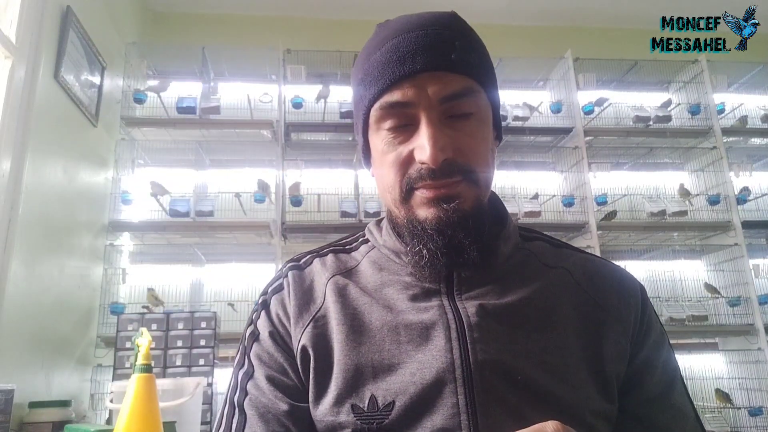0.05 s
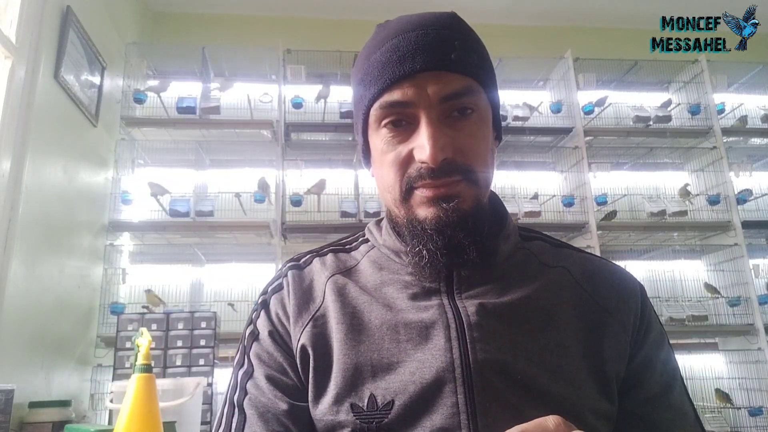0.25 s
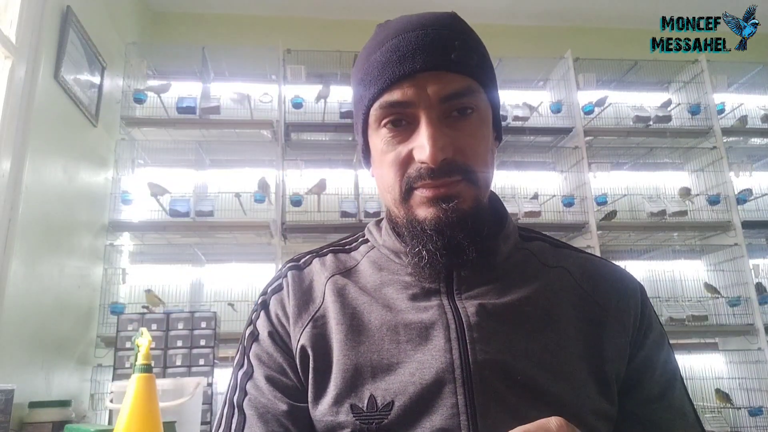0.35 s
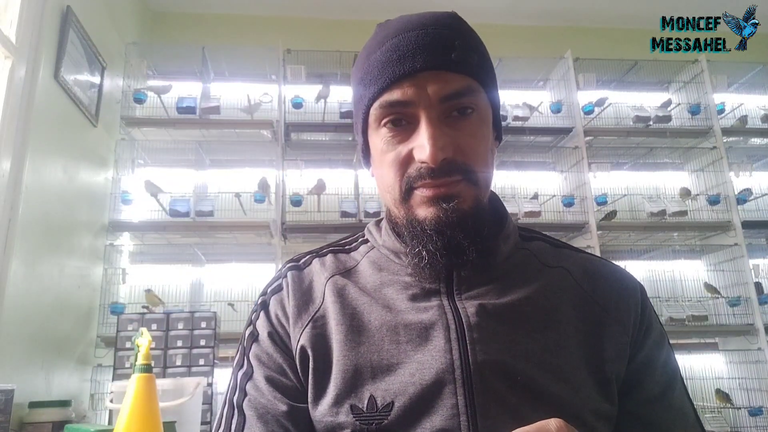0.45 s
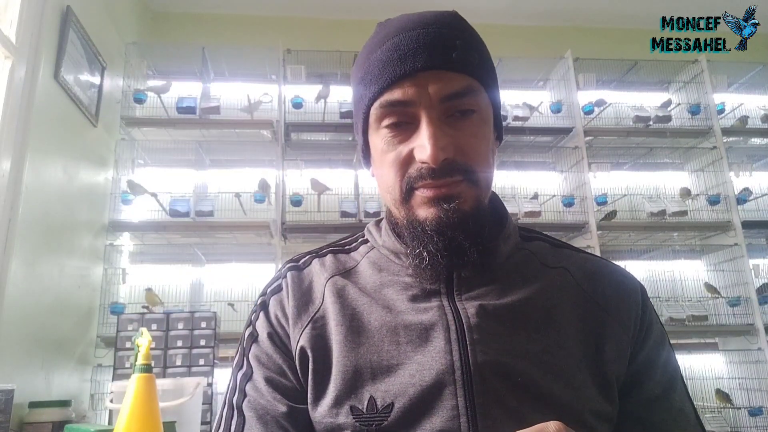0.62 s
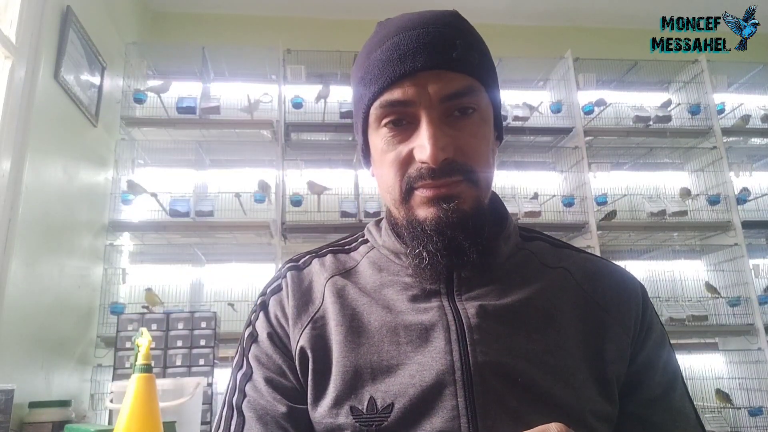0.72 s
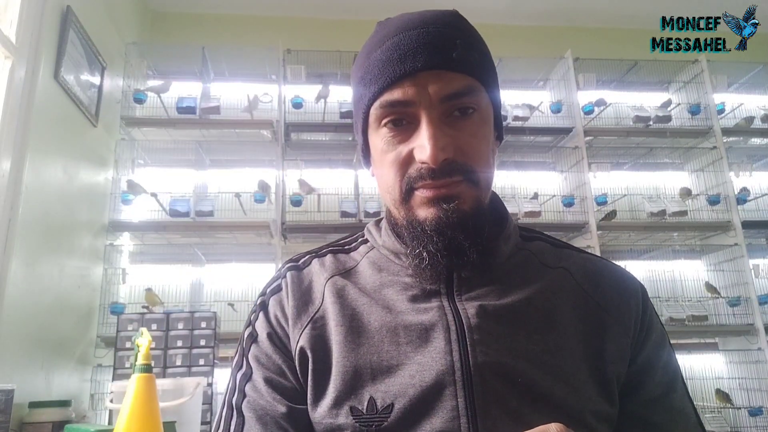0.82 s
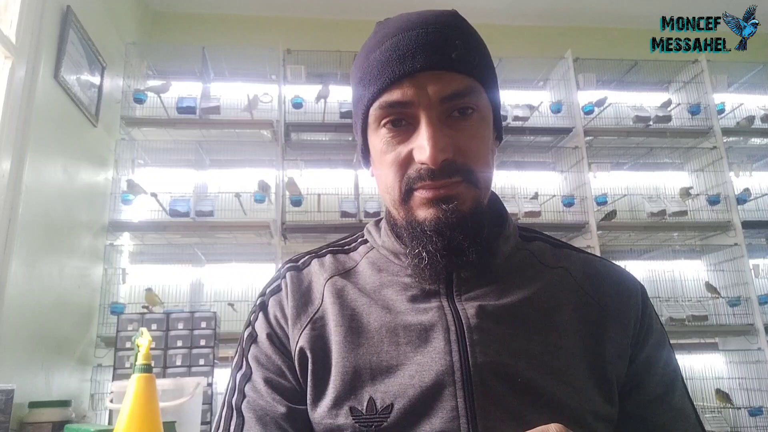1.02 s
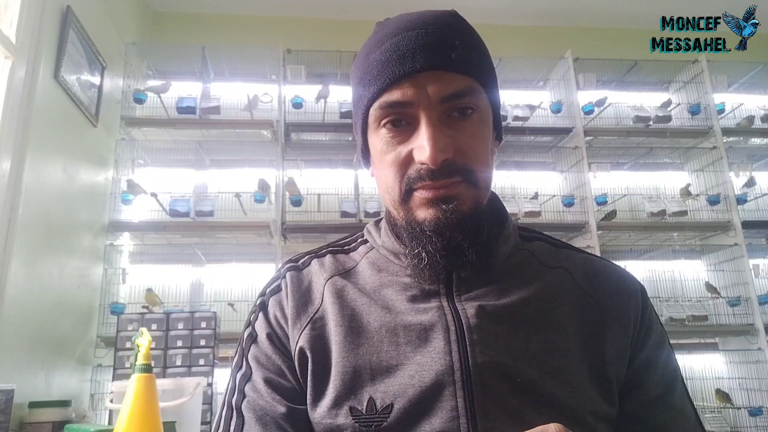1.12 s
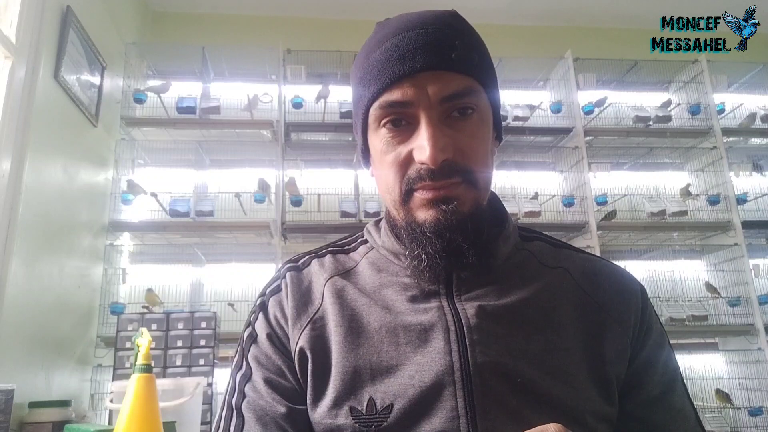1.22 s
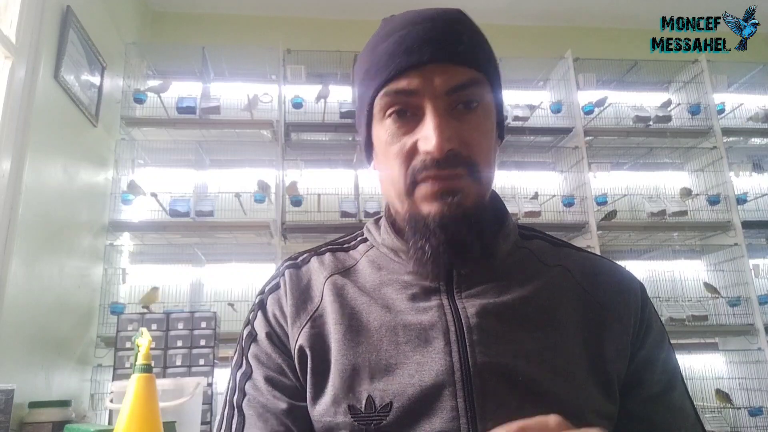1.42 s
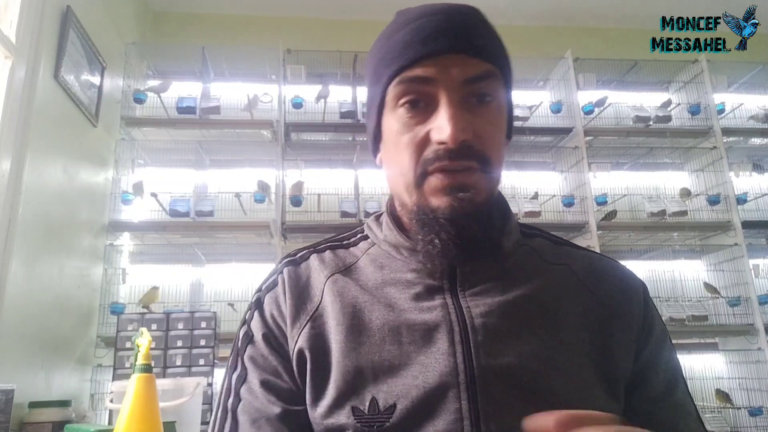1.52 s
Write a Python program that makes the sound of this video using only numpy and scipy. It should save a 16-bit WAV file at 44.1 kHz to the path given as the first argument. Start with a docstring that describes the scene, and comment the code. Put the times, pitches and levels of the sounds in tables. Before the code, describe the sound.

Canaries give soft calls amid light cage rustling, break into quick high whistles and sweeps, then pause before a few quieter chirps and a last scuff. The room adds a short echo and a faint steady hiss.

```python
"""Caged canaries whistle in a hard-walled bird room, over faint steady air noise and a low hum.
First wings and feet scuff in the cages, claws tick on the wires, and the birds give soft low calls.
From about half a second comes a loud tangle of high whistles and quick sweeps, each a gliding tone
of the syrinx with its own room tail. After a lull, soft rising calls and a last rustle end the scene."""
import sys
import numpy as np
from scipy import signal
from scipy.fft import rfft, irfft, next_fast_len
from scipy.io import wavfile
from scipy.ndimage import map_coordinates

SR = 44100
rng = np.random.default_rng(int(sys.argv[2]) if len(sys.argv) > 2 else 0)


def bounce(signal):
    """Save signal as a 16-bit WAV file at the path given by the first command-line argument."""
    frames = np.transpose(np.atleast_2d(signal))
    limited = np.clip(frames, -1, 1)
    pcm = np.round(limited * 32767).astype(np.int16)
    wavfile.write(sys.argv[1], SR, pcm)


N = 68355

# The colour of the room's air noise. Each row: frequency in Hz, relative level in dB.
AIR_SPECTRUM = [(20, -37), (55, 1.5), (85, -7), (130, -6.5), (300, 5), (470, -8.5), (750, -0.5),
                (1100, -0.5), (1900, -12), (2600, -9), (4500, -17.5), (7500, -20), (9500, -23.5),
                (12000, -25), (15500, -42)]
# The low hum. Each row: frequency in Hz, level in dB.
HUM_TONES = [(128, -75.5), (178, -73.5)]
# The ring of the cage wires. Each row: frequency in Hz, relative level in dB, seconds to fall 60 dB.
WIRE_MODES = [(2254, -3, 0.098), (2690, 3, 0.067), (3180, -6, 0.047), (3940, 1, 0.07), (5720, 2.5, 0.057),
              (6270, -12.5, 0.035), (6860, -1, 0.029), (7280, -8, .04)]
# The bright scuff of wings and feet. Each row: frequency in Hz, relative level in dB.
SCUFF_SPECTRUM = [(200, -26.5), (1000, -27), (1950, -27), (2400, 1), (3300, -10), (3900, -5), (4600, -7.5),
                  (5500, -1), (6600, -16), (7500, -9.5), (9400, -28), (11500, -32.5), (15500, -42)]
# The duller rattle of the cage body. Each row: frequency in Hz, relative level in dB.
CAGE_SPECTRUM = [(150, -38.5), (320, -12), (470, -15), (750, -8), (950, -6.5), (1250, -2), (1650, -7.5),
                 (2000, -15.5), (4000, -35)]
# Birds stirring. Each row: start in seconds, scuff level in dB, cage level in dB, seconds to fall 30 dB.
RUSTLE_CUES = [(0.0, -50.5, -50, 0.23), (.047, -49, -69, 0.3), (0.1, -37, -53, 0.35),
               (0.134, -62, -48, 0.18), (.195, -49, -55.5, 0.58), (.555, -46, -55, .14),
               (1.057, -60, -55, 0.055), (1.467, -54, -56, 0.42), (1.517, -44.5, -45, 0.18)]
# The reverb of the hard walls. Each row: frequency in Hz, seconds to fall 60 dB.
ROOM_DECAY = [(300, 0.79), (3000, 0.32), (4200, 0.29), (5500, 0.3), (8000, 0.18), (14000, 0.26)]
# Whistled notes. Each row: start and length in seconds, start, middle and end pitch in Hz, level in dB,
# second and third harmonic in dB against the fundamental, swell up to the middle in dB,
# roughness (0 is a smooth glide), reverb send in dB.
WHISTLE_CUES = [ (0.112, 0.0333, 2854, 3120, 2840, -34.5, -13, -39, -1.5, 0.54, -7.5),
                (0.163, 0.067, 2681, 2880, 2692, -42, -5.5, -52, -6.5, .6, -2),
                (.222, 0.046, 2722, 2900, 2808, -30, -6.5, -41, 14, .2, -16.5),
                (0.291, 0.0435, 2706, 3004, 2937, -25, -13, -53, 16.5, 0.2, -9.5),
                (0.373, 0.079, 3437, 3400, 3670, -38.5, -28.5, -42.5, 5, 0.44, -1.5),
                (0.416, 0.024, 2255, 2302, 2224, -45, 3, -12, 7, .3, -0.5),
                (0.453, 0.075, 5340, 5390, 5570, -49.5, -25, -39.5, 1, 1.1, 0),
                (0.492, .040, 3590, 3560, 3410, -31.5, -31, -46.5, -4.5, 0.42, -6),
                (0.478, 0.11, 4503, 4220, 4020, -21, -35.5, -33.5, 14.5, 0.08, -7.5),
                (0.569, 0.033, 2754, 2700, 2518, -29.5, 2.5, -42, 6, 0.42, -13.5),
                (.584, 0.025, 4064, 4275, 4274, -24.5, -34.5, -41.5, -8.5, 0.3, -2.5),
                (0.593, .052, 2521, 3110, 3192, -26, -23.5, -38, 0, 0.2, -5.5),
                (0.611, 0.028, 3516, 3570, 3610, -33.5, -12.5, -42, 4.5, 0, 2.5),
                (0.642, 0.016, 4027, 3830, 3790, -20, -29, -38.5, 5, 0.04, -2),
                (0.659, .088, 5156, 5857, 5920, -21.5, -30, -30, 4.5, .06, -4),
                (0.674, 0.045, 4893, 4240, 4220, -21, -49, -36, -2, .2, -3),
                (0.731, 0.031, 4917, 4820, 4464, -28.5, -42, -37.5, 7.5, 0, 0.5),
                (0.767, 0.017, 5040, 5000, 4950, -19.5, -38.5, -38.5, 3.5, 0, 0.5),
                (0.787, .066, 5257, 5629, 5715, -20, -34.5, -45, 8, 0.2, -4),
                (0.819, 0.025, 5021, 4970, 4910, -18, -38, -38.5, 13, 0.12, -9.5),
                (.872, .028, 4967, 4970, 4934, -20.5, -38.5, -38, 1, .04, -9),
                (0.938, 0.03, 5657, 5500, 5140, -27, -40, -51.5, 4, 0.7, -9),
                (0.966, 0.05, 2005, 2160, 2073, -61.5, 10, -4.5, -2, 0.5, -14),
                (1.019, 0.046, 4092, 4085, 4114, -26.5, -54, -54.5, 3, 0.11, -9),
                (1.283, 0.031, 2660, 2620, 3010, -53, -14.5, -25, -3, .3, -5.5),
                (1.306, 0.043, 2850, 3950, 4424, -49, -32, -28.5, 3.5, 0.4, 4.5),
                (1.329, .032, 2532, 3000, 3170, -36, -13, -41, 4, 0.58, -7),
                (1.352, 0.18, 4355, 4526, 4437, -47, -48, -38, -2, 0.2, -4.5),
                (1.379, .042, 2448, 3060, 3020, -34, -9.5, -21, 8.5, 0.79, -6.5),
                (1.357, 0.0525, 1073, 1060, 980, -45.5, -38, -43, 10.5, 0, -24),
                (1.515, 0.046, 3052, 3130, 2870, -33.5, -42, -22.5, 6, 0.1, 2)]
# Quick falling chips. Each row: start and length in seconds, start and end pitch in Hz, level in dB.
CHIP_CUES = [(0.15, 0.022, 4130, 3460, -44), (0.476, 0.011, 3653, 2222, -33.5),
             (0.585, 0.014, 7140, 5010, -29), (0.618, 0.037, 4720, 4385, -41),
             (0.681, 0.038, 4370, 3427, -36), (1.008, .018, 3940, 3420, -41.5)]
# The microphone's treble. Each row: frequency in Hz, gain in dB.
MIC_EQ = [(7500, 1), (8600, -6), (9500, -15.5), (10800, -6.5), (12000, -2), (13500, -3.5), (15000, 9.5)]

AIR_DB = -61.5
TICKS_PER_S, TICK_DB, TICK_SPREAD_DB = 350, -6, 3  # tick level is relative to the scuff
RUSTLE_ATTACK_S, RATTLE_DB, RATTLE_PER_S = 0.003, 1.5, 58
DIRECT_DB, PREDELAY_S = -6, 0.004
NOTE_ATTACK_S, RELEASE_SHARE, FOURTH_HARMONIC_DB = 0.0023, 0.22, -43
WAVER_SHARE, WAVER_PER_S, FLUTTER_DB = 0.042, 420, 3.5
MIC_TOP_HZ = 15550


def amp(db):
    """Decibels as a gain."""
    return 10 ** (np.asarray(db) / 20)


def unit_rms(x):
    """x scaled to an rms of 1."""
    return x / np.sqrt(np.mean(x ** 2) + 1e-20)


def curve_at(points, hz):
    """Read a curve of (Hz, value) points along a log frequency axis."""
    point_hz, values = np.transpose(points)
    return np.interp(np.log(hz + 1), np.log(point_hz + 1), values)


def wobble(rate, size=N // 4):
    """A smooth random modulator with rate knots a second."""
    return map_coordinates(rng.standard_normal(N // 16), [np.arange(size) * rate / SR], mode="wrap")


def filtered(x, response):
    """Equalise x with a gain given as a function of frequency."""
    size = next_fast_len(N + SR // 2)
    return irfft(rfft(x, size) * response(np.fft.rfftfreq(size, 1 / SR)), size)[:N]


def noise(spectrum):
    """Coloured noise of rms 1."""
    return unit_rms(filtered(rng.standard_normal(N), lambda hz: amp(curve_at(spectrum, hz))))


def add(out, start_s, x):
    """Mix x into out at start_s."""
    i = max(0, round(start_s * SR))
    out[i:i + len(x)] += x[:max(0, len(out) - i)]


def room_tone():
    """The bed: faint steady air noise and a low hum."""
    t = np.arange(N) / SR
    hum = sum(amp(db) * np.sqrt(2) * np.sin(2 * np.pi * (hz * t + rng.random())) for hz, db in HUM_TONES)
    return amp(AIR_DB) * noise(AIR_SPECTRUM) + hum


def wire_ticks():
    """Claws tick on the wires at random, and each tick sets them ringing."""
    t = np.arange(SR // 8) / SR
    ring = sum(amp(db - 60 * t / t60) * np.sin(2 * np.pi * hz * t) for hz, db, t60 in WIRE_MODES)
    hits = rng.random(N) < TICKS_PER_S / SR
    strength = amp(TICK_SPREAD_DB * rng.uniform(-1, 1, N))
    return unit_rms(signal.fftconvolve(hits * strength, ring)[:N])


def cage_rustles():
    """Scuffs of wings and feet start sharply, rattle the cage and die away."""
    scuff_power, cage_power = np.zeros(N), np.zeros(N)
    for start_s, scuff_db, cage_db, decay_s in RUSTLE_CUES:
        t = np.maximum(np.arange(N) / SR - start_s, 0)
        envelope = amp(-30 * t / decay_s) * (1 - np.exp(-t / RUSTLE_ATTACK_S))
        scuff_power += (amp(scuff_db) * envelope) ** 2
        cage_power += (amp(cage_db) * envelope) ** 2
    rattle = amp(RATTLE_DB * wobble(RATTLE_PER_S, size=N))
    scuff = unit_rms(noise(SCUFF_SPECTRUM) + amp(TICK_DB) * wire_ticks())
    return rattle * (np.sqrt(scuff_power) * scuff + np.sqrt(cage_power) * noise(CAGE_SPECTRUM))


def in_room(call, send_db):
    """A call arrives direct, then off the hard walls as a noise tail of its own."""
    hz, t, spectrum = signal.stft(rng.standard_normal(SR // 2), SR, nperseg=256)
    decay = amp(-60 * t / curve_at(ROOM_DECAY, hz)[:, None])
    tail = signal.istft(spectrum * decay, SR, nperseg=256)[1]
    impulse = np.pad(amp(send_db) * tail / np.linalg.norm(tail), (round(PREDELAY_S * SR), 0))
    impulse[0] = amp(DIRECT_DB)
    return signal.fftconvolve(call, impulse)


def whistle(length_s, glide_hz, second_db, third_db, swell_db, rough):
    """One note of the syrinx: a fluttering glide through three pitches that wavers when it is rough."""
    t = np.arange(int(length_s * SR)) / SR
    hz = np.interp(t, [0, length_s / 2, length_s], glide_hz)
    waver = 1 + rough * WAVER_SHARE * wobble(WAVER_PER_S)[:len(t)]
    phase = 2 * np.pi * np.cumsum(hz * waver) / SR
    ramp = np.minimum(t / NOTE_ATTACK_S, (length_s - t) / (RELEASE_SHARE * length_s))
    gate = np.sin(np.pi / 2 * np.clip(ramp, 0, 1)) ** 2
    contour_db = np.interp(t, [0, length_s / 2], [-swell_db, 0])
    flutter_db = FLUTTER_DB * wobble(WAVER_PER_S)[:len(t)]
    harmonics_db = [0, second_db, third_db, FOURTH_HARMONIC_DB]
    tone = sum(amp(db) * np.sin(k * phase) * (k * hz < SR / 2) for k, db in enumerate(harmonics_db, 1))
    return np.sqrt(2) * tone * gate * amp(contour_db + flutter_db)


def canaries():
    """The lead: gliding whistles and straight falling chips from many cages."""
    out = np.zeros(N)
    for start_s, length_s, *glide_hz, db, second_db, third_db, swell_db, rough, send_db in WHISTLE_CUES:
        note = whistle(length_s, glide_hz, second_db, third_db, swell_db, rough)
        add(out, start_s, amp(db) * in_room(note, send_db))
    for start_s, length_s, start_hz, end_hz, db in CHIP_CUES:
        glide_hz = np.linspace(start_hz, end_hz, 3)
        chip = whistle(length_s, glide_hz, second_db=-29, third_db=-55.5, swell_db=-0.5, rough=0.35)
        add(out, start_s, amp(db) * in_room(chip, send_db=2.5))
    return out


def scene():
    """The mono mix: birds in front, rustles and room tone behind."""
    return (canaries() + cage_rustles() + room_tone())[None]


def record(dry):
    """The microphone has a notch in the treble, a peak above it, and nothing past its band limit."""
    return filtered(dry[0], lambda hz: amp(curve_at(MIC_EQ, hz)) * (hz < MIC_TOP_HZ))[None]


dry = scene()
out = record(dry)
bounce(out)
```